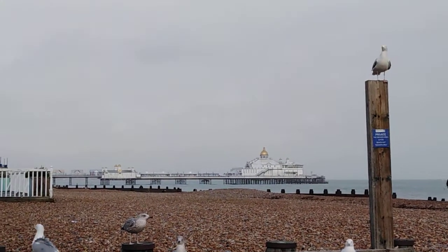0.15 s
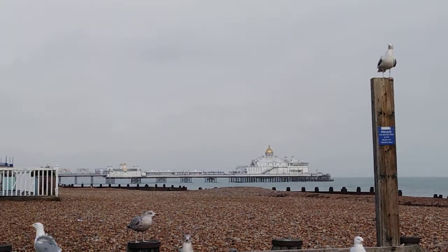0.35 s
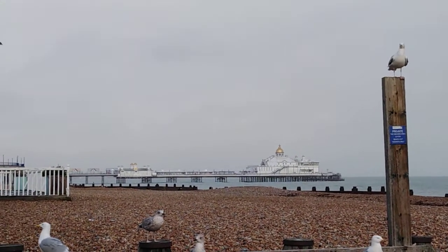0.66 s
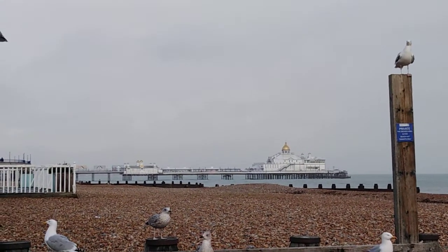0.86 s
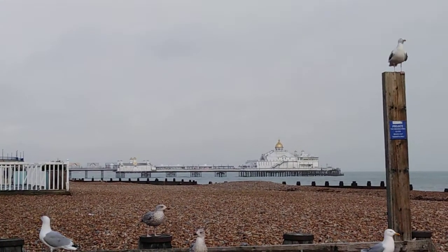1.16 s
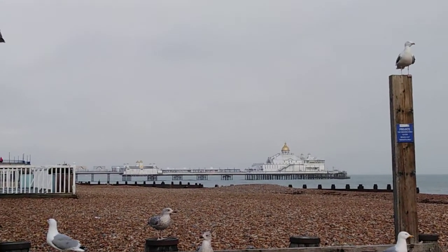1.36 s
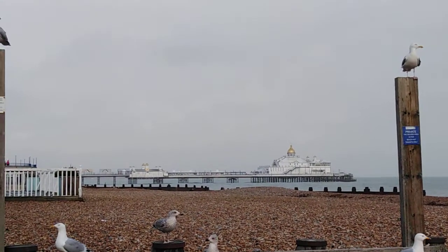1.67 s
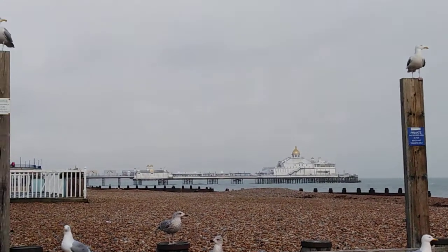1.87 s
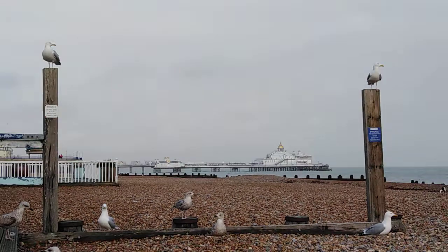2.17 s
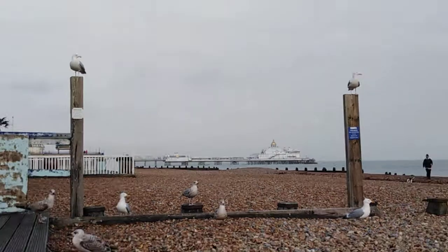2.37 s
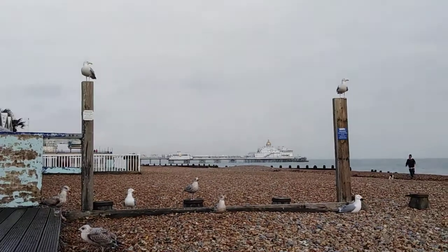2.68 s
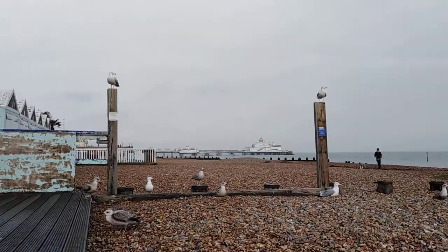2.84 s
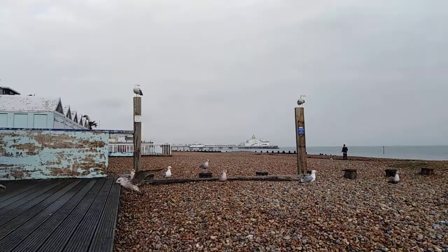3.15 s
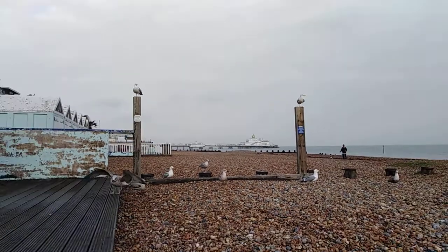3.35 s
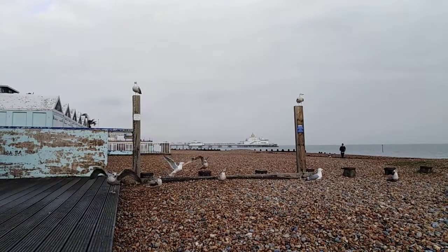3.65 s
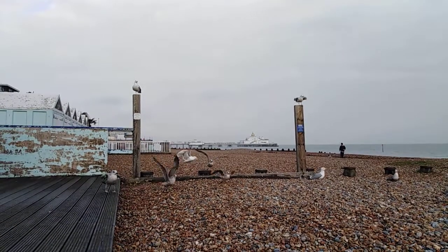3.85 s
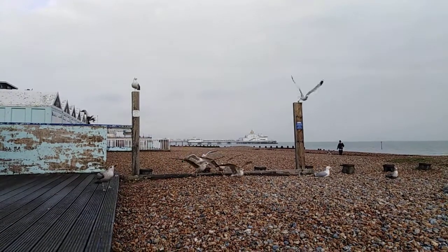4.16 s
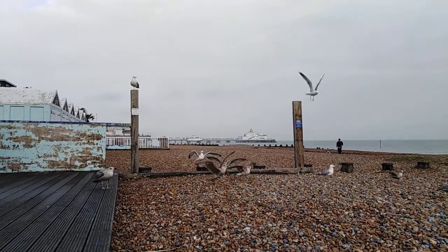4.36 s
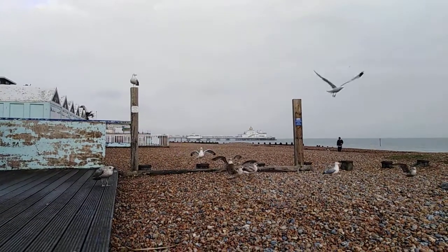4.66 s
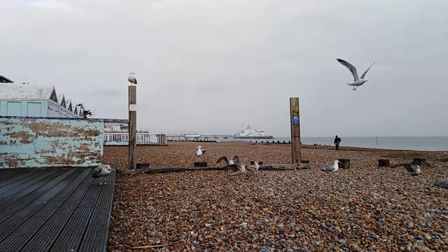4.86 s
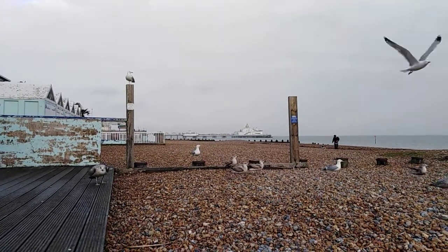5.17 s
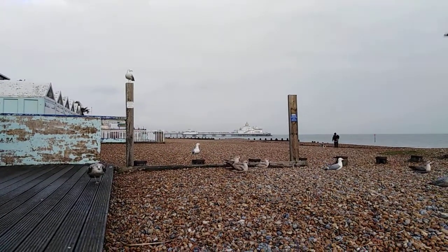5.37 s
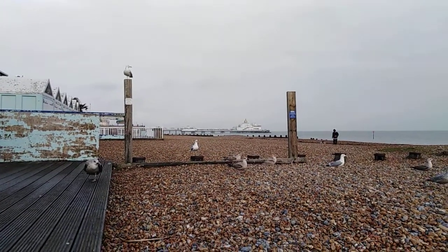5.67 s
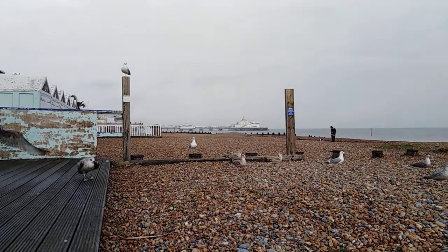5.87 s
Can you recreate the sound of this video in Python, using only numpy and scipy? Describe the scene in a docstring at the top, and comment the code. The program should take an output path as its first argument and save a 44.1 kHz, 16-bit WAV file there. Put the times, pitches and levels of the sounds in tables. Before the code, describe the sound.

Wind rumbles and buffets the microphone on a shingle beach while young gulls whistle thinly and a close gull gives two rasping cries.

```python
"""Wind rumbles in two microphone ports (lumpy noise) over a murmuring sea (filtered noise); young gulls
beg from the start in thin sine whistles and peeps. A close cry at 1.1 s opens with an octave-rich squeak,
then a rasping two-pitch arch laced with clean notes. A wave of stone clicks holds from 1 s and drains after
2.3 s on the left; pebble clicks crunch underfoot from 3 s. A second close cry comes at 4.0 s, and short
noise bursts buffet the ports throughout, hardest near 5.5 s."""
import sys
import numpy as np
from scipy import signal
from scipy.fft import rfft, irfft, next_fast_len
from scipy.io import wavfile
from scipy.ndimage import uniform_filter1d

SR = 44100
rng = np.random.default_rng(int(sys.argv[2]) if len(sys.argv) > 2 else 0)


def generate_wav(signal):
    """Clip the signal to [-1, 1] and save it as 16-bit WAV at the path in sys.argv[1]."""
    frames = np.transpose(np.atleast_2d(signal))
    scaled = np.clip(frames, -1, 1) * 32767
    pcm = np.round(scaled).astype(np.int16)
    wavfile.write(sys.argv[1], SR, pcm)


N = 265482
TIME = np.arange(N) / SR

# Wind pressure on the ports. Each row: time in seconds, rumble level in dB before the overall trim,
# left-right difference in dB.
WIND_PRESSURE = [(0, -39, 3), (0.35, -37.5, -16.5), (0.45, -32, 2), (0.75, -31.5, -6), (1.0, -41.5, -9.5),
                 (1.3, -36.5, -8), (1.78, -41.5, -10), (1.97, -35.5, 33), (2.4, -34.5, 5), (2.85, -33, -5),
                 (3.3, -43, -9), (3.75, -39.5, -0.5), (4.15, -42.5, -1.5), (4.52, -32.5, -4.5),
                 (4.9, -31.5, 8), (5.5, -29.5, 10), (5.83, -28.5, 3), (6.02, -43.5, 17)]
# The hardest eddies that slap a port. Each row: start in seconds, peak level in dB, left-right difference in dB.
WIND_BUFFETS = [(0.441, -28, 17), (0.708, -22.5, 36), (1.958, -28, 33), (2.269, -26, 26),
                (2.753, -24.5, -18), (2.786, -25, 22), (2.852, -28.5, -26), (3.013, -29.5, 28),
                (3.903, -30.5, -24), (4.506, -27.5, -16.5), (4.765, -26, 26), (5.055, -26.5, 11),
                (5.277, -26, 43), (5.416, -24, 32), (5.444, -21, 26), (5.491, -17.5, 27),
                (5.605, -21.5, 37), (5.635, -23.5, 40), (5.68, -24, 37)]
# Spectra of wind, sea, draining wave and crunch. Each row: frequency in Hz, relative density in dB per Hz.
RUMBLE_SPECTRUM = [(38, -31), (62, -3.5), (115, -4), (180, -10), (400, -25.5), (800, -42)]
SEA_SPECTRUM = [(100, 7), (450, -11.5), (800, -10.5), (1050, -12), (1400, -39), (5000, -46), (8000, -48),
                (14000, -53)]
BACKWASH_SPECTRUM = [(1000, -9), (2100, -2.5), (3000, 4.5), (3900, -6), (4700, -10.5), (7000, -36)]
CRUNCH_SPECTRUM = [(4000, -13), (7000, 6), (11000, 5), (14000, -8.5)]
# Crunches of pebbles underfoot. Each row: start in seconds, length in seconds, level in dB.
FOOTSTEPS = [(3.008, 0.058, -64.5), (3.24, 0.088, -59), (3.678, 0.032, -62.5), (3.766, 0.18, -64.5),
             (4.202, .035, -55.5), (5.577, 0.083, -66), (5.744, 0.05, -64.5), (5.805, 0.06, -61.5)]
# Whistles of the gulls farther off. Each row: start in seconds, length in seconds, pitch in Hz, scoop as a share
# of pitch, sag as a share per second (negative rises), level in dB before fade and flutter,
# hoarseness as a share of pitch jitter.
FAR_WHISTLES = [(0.201, 0.12, 6010, 0, 0.9, -57.5, 0.04), (0.328, 0.4, 5800, 0.29, 0.25, -65.5, 0.045),
                (0.415, 0.21, 4995, 0.12, 1.2, -49.5, 0.003), (0.451, 0.11, 4020, 0, 0.84, -54, 0.007),
                (1.074, 0.093, 5630, 0.028, -0.06, -48, 0.004), (1.85, 0.46, 6200, 0.26, 0.59, -61.5, 0.03),
                (2.721, 0.11, 6250, 0.22, 1.37, -52.5, 0.003), (2.816, 0.14, 5307, 0.011, .55, -51, .002),
                (3.476, 0.053, 3686, 0.013, -0.12, -47.5, 0.003),
                (3.54, 0.25, 4130, 0.025, -.85, -57.5, 0.046), (3.55, 0.17, 5580, 0.11, 0.64, -58, 0.004),
                (3.645, 0.077, 5050, 0, -2.0, -55.5, .006), (3.7, 0.065, 5670, 0, 2.05, -53.5, 0.006),
                (3.765, 0.033, 4670, 0.021, 1.3, -42, .003), (3.87, 0.07, 3688, 0, -1.3, -50, 0.003),
                (3.972, 0.073, 4055, 0, 1.1, -48.5, 0.003), (4.7, 0.098, 5120, 0, 0.42, -67.5, 0.0032),
                (5.168, 0.075, 4500, 0, -0.14, -59.5, 0.003), (5.248, 0.19, 4884, 0.12, 0.38, -51.5, 0.003),
                (5.37, .33, 4560, 0, 0.38, -56.5, .002), (5.282, 0.434, 3796, 0.066, 0.18, -56, 0.0088),
                (5.389, 0.087, 6120, 0.12, 1.05, -57, 0.004), (5.441, 0.26, 5240, 0, 0.075, -60, .002),
                (5.685, 0.23, 6400, 0.14, 0.44, -64, 0.015)]
# Short far peeps. Each row: start in seconds, length in seconds, pitch slid down to in Hz, slide as a share
# of pitch, level in dB before flutter.
FAR_PEEPS = [(0.104, 0.083, 3770, 0.048, -61.5), (0.219, 0.072, 3416, 0.28, -51.5),
             (2.609, 0.092, 3730, .16, -54.5), (3.003, 0.035, 3930, 0.068, -55),
             (3.338, 0.075, 3240, 0.23, -52), (3.744, 0.041, 3900, 0.055, -49.5),
             (3.803, 0.043, 3750, 0.11, -45.5), (3.911, 0.059, 3267, 0.024, -54.5),
             (4.788, 0.034, 4010, 0.05, -58.5), (5.575, 0.041, 2965, 0.18, -48)]
# The far gulls lean left, mostly more so higher up. Each row: frequency in Hz, left-right difference in dB.
FAR_GULL_PAN = [(3400, 6.5), (4100, 5), (5700, 9)]
# Squeaks that open the close cries. Each row: start in seconds, settled pitch in Hz, fundamental level in dB,
# octave level in dB.
OPENING_SQUEAKS = [(1.103, 3560, -32.5, -30), (4.01, 3102, -37, -31.5)]
# Clean notes within the close cries. Each row: start in seconds, length in seconds, starting pitch in Hz,
# level in dB.
CLEAN_NOTES = [(1.087, 0.017, 2720, -44.5), (1.145, 0.023, 3120, -42), (1.203, 0.035, 5040, -34.5),
               (1.35, 0.089, 4780, -49), (1.434, 0.13, 4790, -39.5), (1.613, 0.031, 3950, -40),
               (4.029, 0.029, 4420, -36.5), (4.125, 0.019, 5250, -34), (4.149, 0.091, 4470, -40.5),
               (4.158, .1, 4920, -41), (4.299, 0.092, 4720, -44.5), (4.305, .18, 4130, -49.5),
               (4.403, 0.108, 4600, -34), (4.534, 0.037, 3800, -36.5)]
# Close cries, one list a cry, one pitch for each side of the syrinx. Each row: time in seconds, lower pitch in Hz,
# upper pitch in Hz, lower level in dB, upper level in dB (both before the balance wanders),
# rasp level in dB before its filter.
CLOSE_CRIES = [
    [(1.125, 2840, 3940, -44, -39, -39.5), (1.2, 3350, 4784, -59, -51, -45.5),
     (1.26, 3605, 5240, -51, -41, -42.5), (1.31, 3603, 5270, -42, -51, -48),
     (1.4, 3480, 5010, -51.5, -48.5, -47.5), (1.65, 2890, 4290, -58.5, -75, -65)],
    [(4.02, 2800, 4350, -42.5, -48, -38.5), (4.09, 3170, 4884, -52.5, -41.5, -42),
     (4.175, 3678, 5360, -48.5, -48, -45), (4.25, 3600, 5250, -45.5, -38.5, -48.5),
     (4.385, 3440, 5000, -50, -43, -42), (4.58, 2777, 4156, -57.5, -74, -46.5)],
]
# Colour of the close bird's rasp. Each row: frequency in Hz, filter gain in dB.
RASP_COLOUR = [(1500, -21), (2400, -4.5), (3000, 1), (4600, 9.5), (5400, -3), (6200, -4.5), (7200, -5.5),
               (9000, -5.5), (14000, -13.5)]
# The left port is turned away from the close bird. Each row: frequency in Hz, filter gain in dB.
LEFT_PORT_SHADE = [(500, 1.5), (2300, 1.5), (4100, -4.5), (7500, -1), (10000, -24.5), (14000, -9)]

# one wave swells, holds and drains through the shingle
WAVE_CREST_S, WAVE_HOLD_S, WAVE_DB = 1.042, 1.234, -50.5
SWELL_DB_PER_S, DRAIN_DB_PER_S = 18.5, 27
TRICKLE_DB, TRICKLE_FADE_DB_PER_S = -56.5, 3
WHISTLE_SCOOP_S, WHISTLE_FADE_DB = 0.023, 1
SQUEAK_S = 0.024
NOTE_SAG = 0.024   # share of pitch lost over a note
CHAOS_FADE_S = 0.094   # a close cry is most chaotic at its onset


def from_db(db):
    """Decibels to amplitude."""
    return 10 ** (np.asarray(db) / 20)


def rms_one(x):
    """Scale to rms 1."""
    return x / np.sqrt(np.mean(x ** 2) + 1e-20)


def panned(pan_db):
    """Left and right gains that keep the mean power."""
    pan_db = np.atleast_1d(pan_db)
    gains = from_db(np.array([pan_db, -pan_db]) / 2)
    return gains / np.sqrt(np.mean(gains ** 2, axis=0))


def in_time(rows, t):
    """Join the rows of a table into curves over time."""
    s, *columns = np.transpose(rows)
    return [np.interp(t, s, c) for c in columns]


def coloured(x, spectrum):
    """Filter by points joined on a log-frequency axis, falling 24 dB an octave beyond the ends."""
    hz, db = np.transpose(spectrum)
    size = next_fast_len(x.shape[-1])
    f = np.maximum(np.fft.rfftfreq(size, 1 / SR), 1)
    octaves_outside = np.maximum(np.log2(hz[0] / f), 0) + np.maximum(np.log2(f / hz[-1]), 0)
    gain_db = np.interp(np.log(f), np.log(hz), db) - 24 * octaves_outside
    return irfft(rfft(x, size) * from_db(gain_db), size)[..., :x.shape[-1]]


def noise(spectrum):
    """Unrelated noise on each side, rms 1."""
    return rms_one(coloured(rng.standard_normal((2, N)), spectrum))


def drift(rate_hz):
    """Random wander, smoothed by two equal poles, rms 1."""
    r = np.exp(-2 * np.pi * rate_hz / SR)
    wander = signal.lfilter([1], [1, -2 * r, r * r], rng.standard_normal(N + SR))
    return rms_one(wander[SR:])   # drop the filter's run-in


def gate(t, start, end, edge_s):
    """Open from start to end, with soft edges."""
    opening = np.clip(np.minimum(t - start, end - t) / edge_s + .5, 0, 1)
    return np.sin(np.pi / 2 * opening) ** 2


def around(start, end):
    """The samples of a call, with a margin."""
    return slice(max(int((start - .02) * SR), 0), int((end + .02) * SR))


def phase_of(hz):
    """Add up a moving pitch into phase."""
    return 2 * np.pi * np.cumsum(hz) / SR


def tone(phase, level_db):
    """A sine at an rms level."""
    return np.sqrt(2) * from_db(level_db) * np.sin(phase)


def beach(x, wet_db, t60_s):
    """Shingle and hut walls scatter a short diffuse tail back, different on each side."""
    age = TIME[:SR // 2]
    tail = rng.standard_normal((2, len(age))) * from_db(-60 * age / t60_s)
    tail /= np.sqrt(np.sum(tail ** 2, axis=1, keepdims=True))
    echo = signal.fftconvolve(x, tail, axes=1)[:, :N]
    return (x + from_db(wet_db) * echo) / np.sqrt(1 + from_db(wet_db) ** 2)


def buffets(rise_s=0.0087, edge_hz=480, brighten=0.069):
    """Eddies slap the ports as noise bursts; the harder one strikes, the higher its noise reaches."""
    out = np.zeros((2, N))
    age = TIME[:SR // 6]
    burst = age / rise_s * np.exp(1 - age / rise_s)
    whites = rng.standard_normal((len(WIND_BUFFETS), len(age)))
    for (start, db, side_db), white in zip(WIND_BUFFETS, whites):
        top_hz = np.clip(edge_hz * np.exp(brighten * (db + 20.0)), 200, 2000)
        eddy = signal.sosfilt(signal.butter(2, [85, top_hz], "band", fs=SR, output="sos"), white * burst)
        eddy = signal.sosfilt(signal.butter(2, 2 * top_hz, fs=SR, output="sos"), eddy)
        eddy *= np.sqrt(np.sum(burst ** 2) / np.sum(eddy ** 2))   # same energy as the envelope
        first = int(start * SR)
        out[:, first:first + len(age)] += (panned(side_db) * from_db(db) * eddy)[:, :N - first]
    return out


def wind(trim_db=1, lumpy_db=4.5):
    """Turbulent pressure rumbles in lumps on each port, under the slaps of eddies."""
    level_db, pan_db = in_time(WIND_PRESSURE, TIME)
    lumps = rms_one(from_db(lumpy_db * np.array([drift(8.3), drift(13.2)])))
    flow = noise(RUMBLE_SPECTRUM) * lumps
    flow /= np.sqrt(uniform_filter1d(flow ** 2, SR // 5, axis=1))   # gust strength alone sets the slow level
    return from_db(level_db + trim_db) * panned(pan_db) * flow + buffets()


def pebbles(per_s, spread_db, spectrum):
    """Countless stone-on-stone clicks of uneven size, rms 1."""
    sizes = from_db(spread_db * np.minimum(rng.exponential(1, (2, N)), 4)) * rng.choice([-1, 1], (2, N))
    strikes = rng.random((2, N)) < per_s / SR
    return rms_one(coloured(sizes * strikes, spectrum))


def patchy(x, patchy_db, rate_hz, count=14):
    """Narrow bands of a hiss swell and sink, each on its own; rms 1."""
    log_hz = np.log(np.fft.rfftfreq(N, 1 / SR) + 1)
    place = np.interp(log_hz, np.log([1200, 6000]), [0, count - 1])
    spectrum = rfft(x)
    out = np.zeros_like(x)
    for k in range(count):
        band = irfft(spectrum * np.maximum(1 - np.abs(place - k), 0), N)
        out += band * from_db(patchy_db * drift(rate_hz))
    return rms_one(out)


def sea(murmur_db=-48):
    """Far surf murmurs; the near wave hisses as it drains through the stones, over a fading trickle."""
    swell_db = SWELL_DB_PER_S * np.maximum(WAVE_CREST_S - TIME, 0)
    drain_db = DRAIN_DB_PER_S * np.maximum(TIME - WAVE_CREST_S - WAVE_HOLD_S, 0)
    trickle_db = TRICKLE_DB - TRICKLE_FADE_DB_PER_S * TIME
    flow = np.hypot(from_db(WAVE_DB - swell_db - drain_db), from_db(trickle_db))
    stones = pebbles(per_s=16000, spread_db=3.0, spectrum=BACKWASH_SPECTRUM)
    wash = flow * patchy(stones, patchy_db=4.0, rate_hz=13.5)
    murmur = from_db(murmur_db + 2.32 * drift(6.9)) * noise(SEA_SPECTRUM)
    return panned(pan_db=5.5) * wash + murmur


def footsteps(press_s=0.05, settle_s=0.085):
    """Each step presses the pebbles, which then settle."""
    power = np.zeros(N)
    for start, length, db in FOOTSTEPS:
        press = np.clip((TIME - start) / press_s + .5, 0, 1)
        settle = np.exp(-np.maximum(TIME - start - length, 0) / settle_s)
        power += (from_db(db) * press * settle) ** 2
    grains = pebbles(per_s=7000, spread_db=3.5, spectrum=CRUNCH_SPECTRUM)
    return panned(pan_db=-5.0) * np.sqrt(power) * from_db(3.34 * drift(32)) * grains


def whistles(tremble, octave_db=-38):
    """Thin, trembling sines, some hoarse, scoop up onto pitch, then mostly sag while fading."""
    out, jitter = np.zeros(N), drift(600)
    for start, length, hz, scoop, sag, db, hoarse in FAR_WHISTLES:
        at = around(start, start + length)
        age = np.maximum(TIME[at] - start, 0)
        glide = (1 - scoop * np.exp(-age / WHISTLE_SCOOP_S)) * np.exp(-sag * age)
        phase = phase_of(hz * (tremble[at] + hoarse * jitter[at]) * glide)
        level_db = db - WHISTLE_FADE_DB * (age / length) ** 2
        voice = tone(phase, level_db) + tone(2 * phase, level_db + octave_db)
        out[at] += gate(TIME[at], start, start + length, edge_s=0.023) * voice
    return out


def peeps(tremble, slide_s=0.017):
    """Short trembling sines slide down onto their pitch."""
    out = np.zeros(N)
    for start, length, hz, slide, db in FAR_PEEPS:
        at = around(start, start + length)
        age = np.maximum(TIME[at] - start, 0)
        phase = phase_of(hz * tremble[at] * (1 + slide * np.exp(-age / slide_s)))
        out[at] += gate(TIME[at], start, start + length, edge_s=0.009) * tone(phase, db)
    return out


def far_gulls(flutter_db=2):
    """Whistles and peeps share one tremble and flutter, panned by frequency."""
    tremble = 1 + .006 * drift(30)
    calls = whistles(tremble) + peeps(tremble)
    pan_db = np.interp(np.fft.rfftfreq(N, 1 / SR), *np.transpose(FAR_GULL_PAN))
    return irfft(rfft(calls * from_db(flutter_db * drift(60))) * panned(pan_db), N)


def squeaks(slide=0.0267, slide_s=0.03, rough=0.01, half_db=-24, third_db=-18, rasp_db=-9):
    """A hard onset with a strong octave, half-pitch sidebands and a rasp of noise."""
    out, breath, jitter = np.zeros(N), np.zeros(N), drift(350)
    for start, hz, first_db, octave_db in OPENING_SQUEAKS:
        at = around(start, start + SQUEAK_S)
        age = np.maximum(TIME[at] - start, 0)
        phase = phase_of(hz * (1 + slide * np.exp(-age / slide_s) + rough * jitter[at]))
        voice = tone(phase, first_db) + tone(2 * phase, octave_db)
        voice += tone(3 * phase, first_db + third_db) * (1 + np.cos(phase))   # adds to harmonics 2, 3 and 4
        voice *= 1 + from_db(half_db) * np.cos(phase / 2)
        opening = gate(TIME[at], start, start + SQUEAK_S, edge_s=0.0079)
        out[at] += opening * voice
        breath[at] += opening * from_db(first_db + rasp_db)
    return out + breath * noise(RASP_COLOUR)[0]


def held_notes(rough=0.00081, octave_db=-22, third_db=-27, edge_s=0.021):
    """The voice locks onto near-steady notes with soft harmonics, each sinking a little."""
    out, jitter = np.zeros(N), drift(220)
    for start, length, hz, db in CLEAN_NOTES:
        at = around(start, start + length)
        age = np.maximum(TIME[at] - start, 0)
        phase = phase_of(hz * (1 - NOTE_SAG * age / length + rough * jitter[at]))
        voice = tone(phase, db) + tone(2 * phase, db + octave_db) + tone(3 * phase, db + third_db)
        out[at] += gate(TIME[at], start, start + length, edge_s) * voice
    return out


def shattered(upper, quarter_beat, chaos, count=36):
    """Lines a quarter beat apart swell singly; chaos makes them flicker, the high ones most; rms 1."""
    rungs = np.arange(count)[:, None] - count // 5
    quick, slow = rng.standard_normal((2, count, len(upper)))
    flicker = rms_one(signal.sosfilt(signal.butter(2, 160, fs=SR, output="sos"), quick))
    swell = rms_one(signal.sosfilt(signal.butter(2, 12, fs=SR, output="sos"), slow))
    share = np.clip(chaos * (1 + np.maximum(rungs, 0) / 6), 0, 1)
    strength = (np.sqrt(1 - share ** 2) + share * flicker) * from_db(5 * np.clip(swell, -2, 2))
    start_phase = rng.uniform(0, 2 * np.pi, (count, 1))
    lines = strength * np.sin(upper + rungs * quarter_beat + start_phase)
    return rms_one(np.sum(lines, axis=0))


def close_cries(sum_db=-15, octave_db=-22, lower_octave_db=-3, unsteady_db=2.0):
    """Both sides of the syrinx whistle an arch; their coupling adds lines around and above them."""
    out, rasp = np.zeros(N), np.zeros(N)
    waver, rough = .005, .008   # shares of pitch
    slow, fast, other, balance = drift(54), drift(350), drift(350), drift(14)
    for cry in CLOSE_CRIES:
        start, end = cry[0][0], cry[-1][0]
        at = around(start, end)
        lower_hz, upper_hz, lower_db, upper_db, rasp_db = in_time(cry, TIME[at])
        chaos = .5 + .9 * np.exp(-((TIME[at] - start) / CHAOS_FADE_S) ** 2)
        upper = phase_of(upper_hz * (1 + waver * slow[at] + rough * chaos * fast[at]))
        lower = phase_of(lower_hz * (1 + waver * slow[at] + rough * chaos * other[at]))
        quarter_beat = phase_of(upper_hz - lower_hz) / 4
        # the two sides trade strength
        upper_db = upper_db + unsteady_db * balance[at]
        lower_db = lower_db - unsteady_db * balance[at]
        voice = tone(upper, upper_db) + tone(2 * upper, upper_db + octave_db)
        voice += tone(upper + lower, upper_db + sum_db)
        voice += tone(lower, lower_db) + tone(2 * lower, lower_db + lower_octave_db)
        opening = gate(TIME[at], start, end, edge_s=0.031)
        out[at] += opening * voice
        rasp[at] += opening * from_db(rasp_db) * shattered(upper, quarter_beat, chaos)
    return out + coloured(rasp, RASP_COLOUR)


def from_the_right(x, late_samples=2):
    """The sound reaches the left port two samples late, there 2 dB stronger before shading."""
    return np.array([np.roll(x, late_samples), x]) * panned(pan_db=2.0)


def close_gull():
    """Squeaks, arches and clean notes reach the two ports, with the left one shaded."""
    voice = close_cries() + held_notes() + squeaks()
    left, right = beach(from_the_right(voice), wet_db=-4.0, t60_s=0.13)
    return beach(np.array([coloured(left, LEFT_PORT_SHADE), right]), wet_db=-11, t60_s=.75)


def scene():
    """Wind, sea, shingle, far gulls and the close gull."""
    far = beach(far_gulls(), wet_db=-1, t60_s=.45)
    return wind() + sea() + footsteps() + far + close_gull()


def record(dry):
    """The deepest rumble and the top are cut."""
    dry = signal.sosfilt(signal.butter(2, 40, "high", fs=SR, output="sos"), dry)
    return signal.sosfilt(signal.ellip(10, .2, 80, 14100, fs=SR, output="sos"), dry)


dry = scene()
out = record(dry)
generate_wav(out)
```